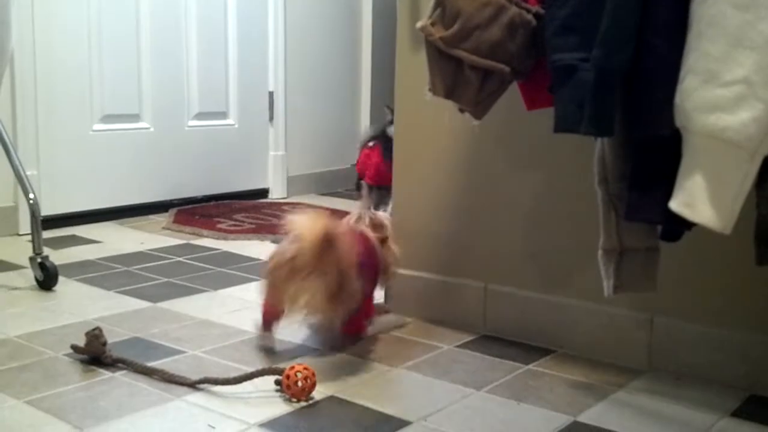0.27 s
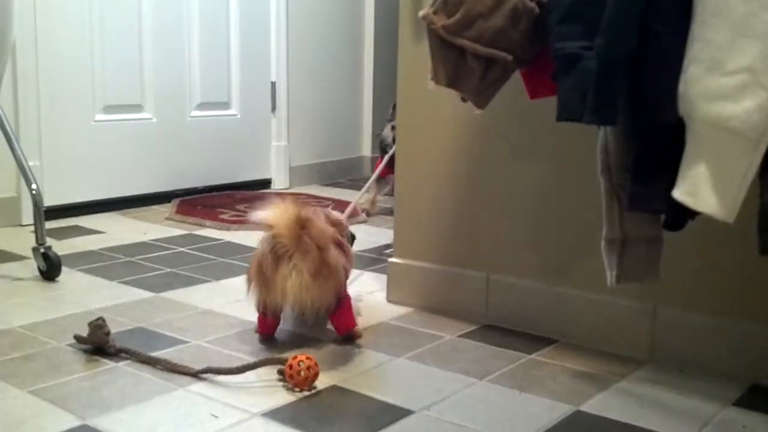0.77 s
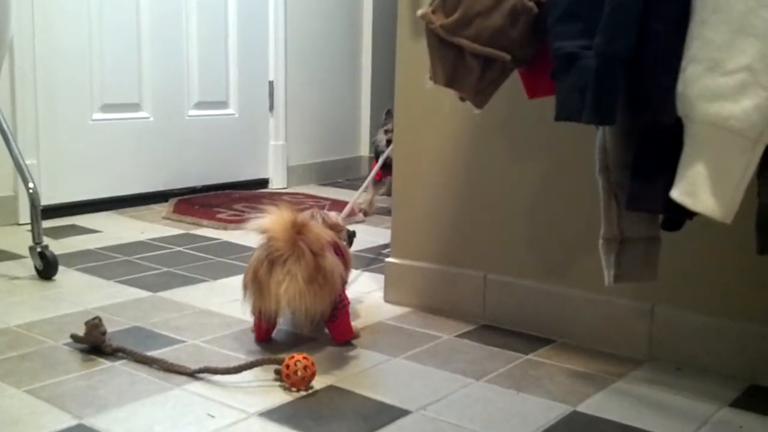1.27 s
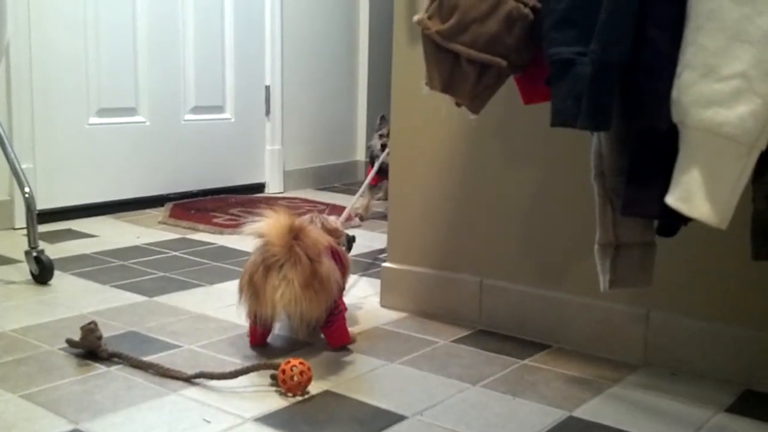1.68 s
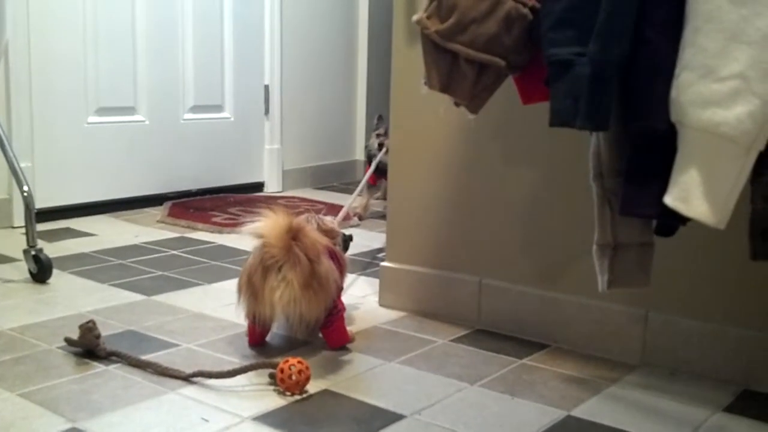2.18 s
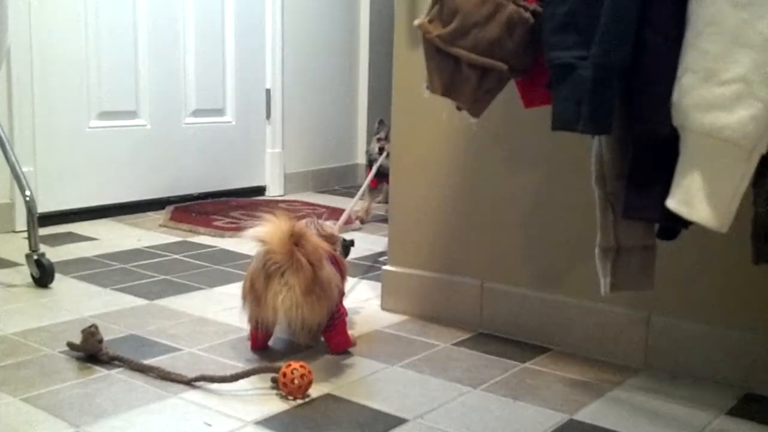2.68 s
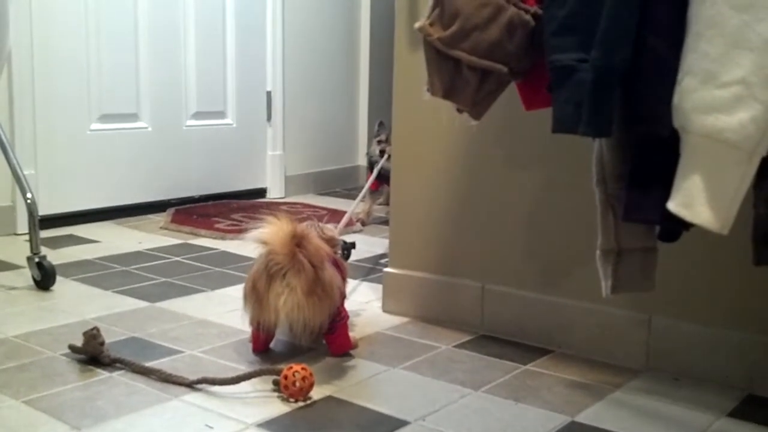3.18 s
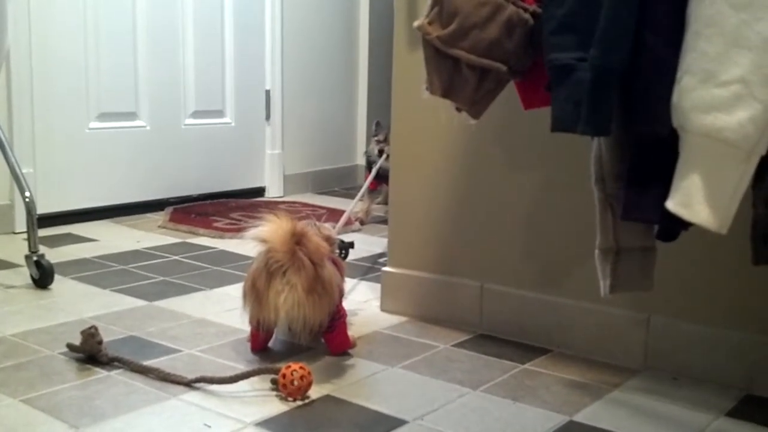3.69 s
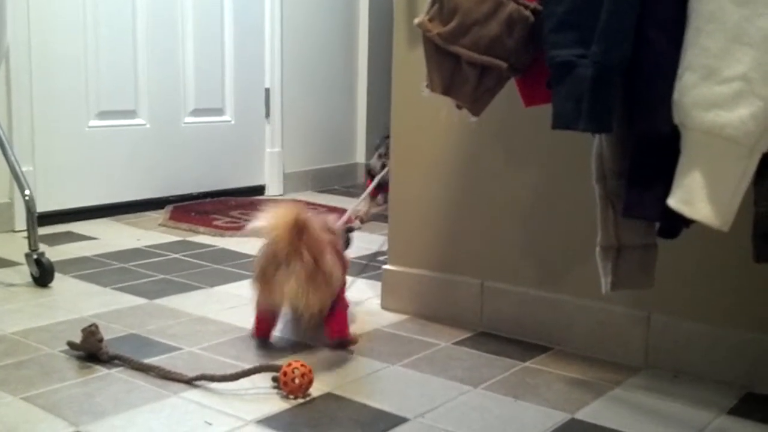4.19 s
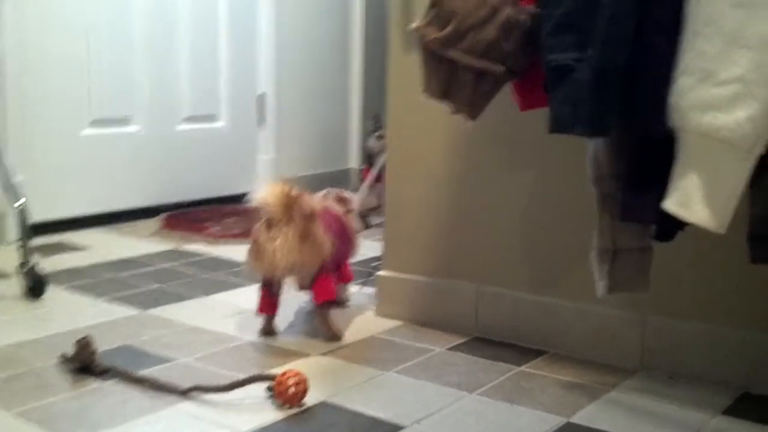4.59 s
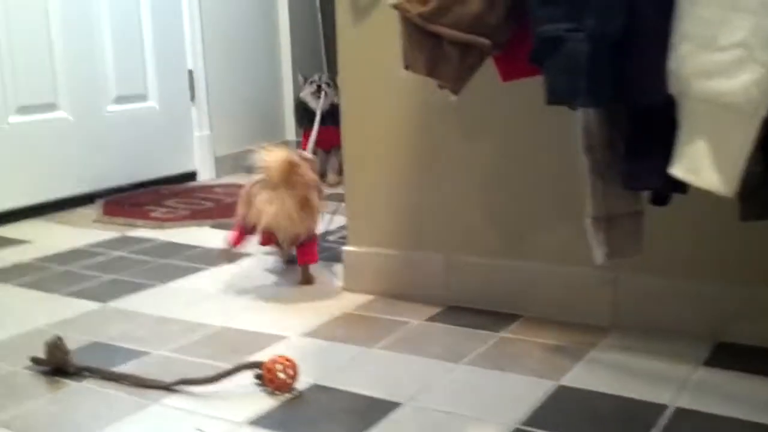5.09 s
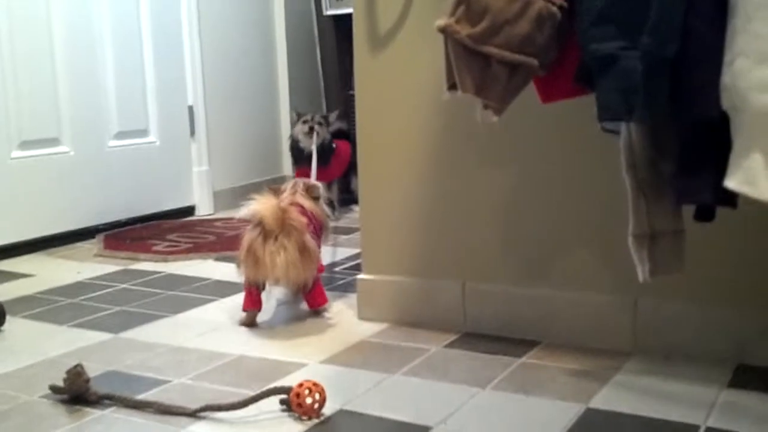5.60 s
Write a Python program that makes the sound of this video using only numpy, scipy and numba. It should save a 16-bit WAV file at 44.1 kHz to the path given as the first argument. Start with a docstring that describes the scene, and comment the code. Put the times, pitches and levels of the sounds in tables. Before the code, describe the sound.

Two small dogs play tug in a tiled hallway, a couple of metres from a hand-held stereo microphone. One snorts and gives a quick run of hoarse barks, then growls through its teeth in long throbbing stretches while the other growls lower and softer underneath. Paws scuff faintly on the tiles. Near the end come more snorts and short barks, and both finish growling. A few tiny ticks sound on the microphone.

```python
"""Two small dogs tug a rope in a tiled hallway, a couple of metres from a hand-held stereo microphone.
First the higher dog snorts and barks hoarsely while the lower one hums under it and paws scuff the tiles.
Near 1 s the microphone's housing ticks; then the higher dog growls through its teeth, vocal folds pulsing,
loose tissue fluttering. From 4.3 s it snorts and barks again, and both end on a growl. Two spaced ports
hear dogs, walls and faint room noise; each is subtracted, late, from the other to widen the image."""
import sys
import numpy as np
from scipy import signal
from scipy.fft import rfft, irfft
from scipy.io import wavfile
from scipy.ndimage import uniform_filter1d
from numba import njit

SR = 44100
rng = np.random.default_rng(int(sys.argv[2]) if len(sys.argv) > 2 else 0)


def transcribe(u):
    """Save the signal u as a 16-bit wav file named by the first command-line argument.

    u: samples, shape (n,) or (channels, n), limited to [-1, 1]; the rate is SR.
    q: integer samples, one column per channel.
    """
    v = np.clip(np.atleast_2d(u).T, -1, 1)
    q = np.round(v * 32767).astype(np.int16)
    wavfile.write(sys.argv[1], SR, q)


N = 257984

# Higher dog's barks: start_s, length_s, top_pitch_hz, base_level_db, mouth_open (0-1), chest_db, air_db,
# throat_ratio (scales the resonances), pitch_arch_exponent, top_resonance_db
BARKS = [(-.005, 0.31, 322.5, -27.5, 0.93, 0.5, -5, 0.92, 1.1, -3.7),
         (0.169, 0.12, 318.2, -31, 0.88, 7.5, -0.5, 0.92, 0.79, -4),
         (0.282, 0.21, 290.7, -32.5, 0.66, -1, -3.5, 0.96, 0.65, -5),
         (0.505, 0.17, 335.3, -28, 0.59, 0.5, -4, 0.934, 1.3, -10),
         (0.622, 0.27, 304.6, -31, 0.22, -0.5, -6, 0.941, 1.2, -3.5),
         (4.302, .18, 337.5, -28.5, 0.96, 2, 0, 0.95, 2, 0.3),
         (4.561, 0.13, 291.3, -50, 0.85, -10, 9.5, 0.87, 0.56, 8.2),
         (5.013, .14, 396, -24, 1, -3, -26, 0.96, 2.2, -1.2)]
# Course of every bark; the chest tone sinks while the cry is hardest:
# length_share, pitch_ratio, level_offset_db, chest_offset_db, mouth_share
BARK_COURSE = [(0, .88, -9, 4, 0.87), (0.12, 0.94, -2.5, 2, 0.84), (0.331, 1.0, 1, -8.5, 0.97),
               (0.523, 0.96, -8, 4, 0.98), (0.749, .91, -11.5, -10.5, 0.83), (1, .88, -27.5, 10, 0.15)]
# Each dog's growls, one curve a growl: time_s, pitch_hz, base_level_db
HIGH_GROWLS = [
    [(1.194, 224.9, -54), (1.206, 225, -41), (1.26, 225.8, -39.5), (1.35, 218.5, -41.5),
     (1.8, 220.7, -42.5), (2.2, 219.9, -43.5), (2.29, 225.8, -42)],
    [(2.3, 232, -40.5), (2.4, 235, -41), (2.5, 226, -41), (2.58, 227.4, -42.5), (2.67, 222.9, -42),
     (2.73, 225.3, -78)],
    [(3.21, 189, -58), (3.29, 201.2, -48), (3.45, 198.6, -51), (3.6, 207.8, -51), (3.72, 216.3, -52),
     (4.02, 218.6, -49), (4.1, 220.5, -49), (4.22, 223.3, -47)],
    [(4.245, 250.9, -38.5), (4.275, 264.4, -42.5), (4.297, 253.6, -32.5)],
    [(4.93, 178.9, -53), (4.945, 185.3, -42.5), (4.965, 197.7, -41.5), (4.985, 211.7, -39),
     (5.005, 228, -34.5)],
    [(5.19, 287.7, -38.5), (5.24, 281, -41), (5.29, 272, -42)],
    [(5.315, 265.1, -40.5), (5.35, 259.8, -40.5), (5.43, 250.5, -44.5), (5.5, 242.7, -44)],
    [(5.52, 237.4, -43), (5.6, 229.5, -42), (5.7, 224.7, -43.5), (5.85, 234.7, -39)],
]
LOW_GROWLS = [
    [(.2, 171.9, -56), (.35, 195.8, -55), (.5, 187.2, -47), (.6, 183.3, -51), (.69, 199.6, -49),
     (.93, 166, -58), (1.2, 153.5, -56), (1.34, 136.9, -61)],
    [(2.18, 150.9, -82), (2.27, 152.2, -53), (2.52, 156.4, -56.5), (2.68, 172.4, -51), (2.87, 166.2, -53.5),
     (3.0, 160.1, -57), (3.31, 152.1, -53.5), (3.58, 151.5, -53), (3.85, 163.1, -51), (4.0, 174.5, -49.5),
     (4.15, 186, -44), (4.2, 192.4, -48)],
    [(4.225, 196.6, -47.5), (4.27, 197, -48.5), (4.31, 196.3, -38.5)],
    [(5.15, 197.1, -59), (5.3, 190.8, -60), (5.57, 181.1, -53), (5.7, 180.7, -51), (5.85, 190.3, -54.5)],
]
# Posture in each growl: mouth_open (0-1), chest_db, air_db, throat_ratio, top_resonance_db
HIGH_POSTURES = [(0.04, -1, -9, 0.987, -1.4), (0.13, -1.5, -11, 0.987, -0.3), (0.1, 4, -12, 0.957, 1.6),
                 (0.34, -12, -11, 1.25, -5), (0.27, 1, -4.5, 0.947, -11), (0.71, -8, 1, 1.12, -1),
                 (0.73, 2.5, 0, 1.033, -1.3), (0.47, 1.5, -1, 0.911, -3.5)]
LOW_POSTURES = [(0.73, -2.5, 1.5, 1.05, 0), (0.22, 6, -6.5, 0.979, 0), (0.66, -15, -2, 1.026, 0),
                (0.39, 5.5, -32, 0.947, 0.0012)]
# Texture of each bark or growl: roughness (0-1), mean_flutter_depth (0-1)
BARK_TEXTURES = [(.65, .42), (.5, .4), (.38, .35), (.45, .25), (.1, .12), (.65, .3), (.5, .4), (.7, .4)]
HIGH_TEXTURES = [(.14, .62), (.16, .5), (.3, .3), (.2, .15), (.5, .2), (.55, .35), (.4, .3), (.4, .5)]
LOW_TEXTURES = [(.15, .2), (.32, .3), (.12, .15), (.38, .3)]
# Throat resonances, mouth shut and open: shut_hz, open_hz, base_width_hz, shut_db, open_db
HIGH_THROAT = [(321, 510, 262, -4, -8.5), (867, 956, 155, -4, -17.5), (1480, 1517, 355, -20, -4.5),
               (2317, 2250, 307, -10, -32), (4015, 4570, 2030, -17.5, -20.5)]
LOW_THROAT = [(308, 242, 144, 6, 9.5), (608, 524, 147, 0, 1), (1080, 1210, 500, -29, 3.5),
              (2100, 2800, 410, -28, -31), (3800, 3900, 400, -56, -38)]
# How hard each resonance throbs, the second the most: flutter_exponent
THROB_EXPONENTS = (.8, 1.15, .6, .4, .3)
# In the higher dog's long growls the chest tone hangs under the pitch, then joins it: time_s, pitch_ratio
CHEST_SAG = [(1.1, 1), (1.2, .94), (1.35, .935), (1.7, .95), (2.25, 1), (3.55, 1), (3.75, .94), (4.0, .94),
             (4.2, 1)]
# Resonance behind the higher dog's teeth in the long growls: time_s, centre_hz, gain_db
TEETH_RESONANCE = [(1.099, 3900, -53), (1.2, 3902, -11.5), (1.45, 4045, -10), (1.8, 4034, -10),
                   (2.1, 4252, -12.5), (2.7, 4370, -12.5), (3.3, 4008, -11), (4.0, 4101, -11.5),
                   (4.2, 4205, -60)]
# Snorts through the nose: peak_s, length_s, flow_db
SNORTS = [(0.063, 0.026, -36), (0.566, 0.038, -52), (4.28, 0.034, -34.5), (4.357, 0.054, -54),
          (4.49, 0.069, -48), (5.09, 0.083, -32)]
# Paws on the tiles, plus one short 4 kHz click near 1.04 s: start_s, decay_s, level_db, centre_hz
PAW_SCUFFS = [(0.035, 0.09, -55, 6130), (0.553, 0.041, -58, 9000), (0.917, 0.037, -45, 4194),
              (1.044, .01, -58, 4200), (4.044, .12, -52, 13560), (4.072, 0.091, -49, 4200),
              (4.166, 0.098, -62, 13000), (4.476, 0.078, -64, 4446), (4.589, 0.059, -65, 5440),
              (4.673, 0.088, -56, 4918), (4.844, .015, -60, 5020)]
# Ticks on the microphone's housing: start_s, strength_db
HOUSING_TICKS = [(0.9862, -43), (0.9959, -30), (1.0035, -42), (1.0244, -44), (1.031, -28), (1.0357, -30),
                 (3.952, -45), (4.8541, -32)]
# Spectrum of the empty hallway: frequency_hz, relative_density_db
ROOM_SPECTRUM = [(60, 1), (130, 15), (400, -4.5), (1000, -4), (1600, -2.5), (3000, -12.5), (8000, -27.5),
                 (16000, -31)]

# (clear, rough) voice: cycle-length jitter, strong-weak alternation, rasp against the harmonics
JITTER, ALTERNATION, RASP_DB = (.004, .04), (.07, .36), (-10, -3)
SOFT_CLOSURE_HZ = 2600  # above this the fold pulses give way to rasp
CHEST_WAVER_DB, CHEST_LOSS = 2.5, .92  # loss in dB per dB over the growl's mean level
TEETH_WIDTH_HZ, AIR_TOP_HZ, AIR_TOP_DB = 1150, 11340, 4
SCUFF_ATTACK_S, SCUFF_WIDTH_RATIO, GRIT_DB = .006, .81, 1
HALL_T60_S, HALL_TREBLE_T60_S, HALL_DB, ROOM_NOISE_DB = .42, .4, -5, -49
HIGH_LAG_S, LOW_LAG_S = .00014, .00005  # each dog reaches the left port first
PORTS_ALIKE_HZ = 790  # below this both ports hear nearly the same tail
SHADE_HZ, SHADE_DB = 1220, -69  # the housing shades the right port's treble
WIDEN_LAG_SAMPLES, WIDEN_SHARE, BASS_CUT_HZ, TOP_CUT_HZ = 16, .99, 120, 15750


def barks():
    """Bark phrases for dog(): pitch, level and mouth arch and fall, unless the next bark cuts in."""
    share, pitch_ratio, swell_db, sink_db, gape = np.transpose(BARK_COURSE)
    next_starts = [bark[0] for bark in BARKS[1:]] + [N / SR]
    phrases = []
    for bark, next_s, texture in zip(BARKS, next_starts, BARK_TEXTURES):
        start_s, length_s, top_hz, level_db, mouth, chest_db, air_db, stretch, arch, bright_db = bark
        times = start_s + share * length_s
        pitch_hz = top_hz * pitch_ratio ** arch
        curve = np.c_[times, pitch_hz, level_db + swell_db, chest_db + sink_db, mouth * gape]
        phrases.append((curve[times < next_s], (air_db, stretch, bright_db, *texture)))
    return phrases


def growls(curves, postures, textures):
    """Growl phrases for dog(): as effort rises, the chest tone gains less than the overtones."""
    phrases = []
    for curve, (mouth, chest_db, *tone), texture in zip(curves, postures, textures):
        level_db = np.transpose(curve)[2]
        chest_curve_db = chest_db - CHEST_LOSS * (level_db - level_db.mean())
        phrases.append((np.c_[curve, chest_curve_db, np.full(len(curve), mouth)], (*tone, *texture)))
    return phrases


def dog(phrases, throat, sag, snorts=(), teeth=None):
    """Fold pulses and rasp, puffed out once a cycle, ring the chest, the throat and any teeth gap."""
    gate, curves, posture = articulation(phrases)
    pitch_hz, level_db, chest_db, mouth = curves
    air_db, stretch, bright_db, roughness, flutter_depth = posture
    jitter, alternation, rasp_db = (clear + roughness * (rough - clear)
                                    for clear, rough in (JITTER, ALTERNATION, RASP_DB))
    drift = 1 + .005 * wander(30)
    chance = rng.standard_normal((N // 50, 2))
    pulses, phase = vocal_folds(pitch_hz * drift, jitter, alternation, chance)
    pulses = butter(pulses, 2, SOFT_CLOSURE_HZ)
    chest_hz = pitch_hz * follow(sag)[0]
    chest_pulses, _ = vocal_folds(chest_hz * drift, jitter, alternation, chance)
    flutter = tissue_flutter(flutter_depth)
    puff = unit_rms(np.exp(-phase / 1.4)) * flutter ** .11
    harmonic_strength = np.sqrt(SR / 2 / pitch_hz)  # noise this big equals the harmonics, per Hz
    rasp = undb(rasp_db) * harmonic_strength * puff * rng.standard_normal(N)
    chest = resonance(chest_pulses * (flutter + .2) ** .3 + .5 * rasp, chest_hz, .35 * pitch_hz)
    voice = undb(chest_db + CHEST_WAVER_DB * wander(16)) * chest
    for k, (shut_hz, open_hz, base_width_hz, shut_db, open_db) in enumerate(throat):
        drive = (pulses if k else chest_pulses) * flutter ** THROB_EXPONENTS[k] + rasp
        centre_hz = stretch * (shut_hz + mouth * (open_hz - shut_hz))
        gain_db = shut_db + mouth * (open_db - shut_db) + (k == len(throat) - 1) * bright_db
        voice += (-1) ** (k + 1) * undb(gain_db) * resonance(drive, centre_hz, 1.133 * base_width_hz)
    if teeth is not None:
        teeth_hz, teeth_db = follow(teeth)
        voice += undb(teeth_db) * resonance(pulses + rasp, teeth_hz, TEETH_WIDTH_HZ)
    air = breath(gate * undb(level_db + air_db), snorts, puff)
    return gate * undb(level_db + 7) * voice + air


def articulation(phrases, fade_s=.01954):
    """The voice fades in and out of each (curve, posture) phrase; the throat glides between postures."""
    t = np.arange(N) / SR
    points = np.vstack([curve for curve, _ in phrases])
    curves = follow(points[np.argsort(points[:, 0])])
    gate, posture = np.zeros(N), np.ones((5, N))
    for curve, held in phrases:
        inside_s = np.minimum(t - curve[0, 0], curve[-1, 0] - t)
        sounding = np.clip(1 + inside_s / fade_s, 0, 1)
        gate = np.maximum(gate, sounding)
        posture[:, sounding > 0] = np.array(held)[:, None]
    return gate, curves, uniform_filter1d(posture, int(fade_s * SR), axis=1)


@njit
def vocal_folds(pitch_hz, jitter, alternation, chance):
    """One pulse per closing of the folds; each cycle has its own length and size."""
    pulses, phases = np.zeros(N + 1), np.empty(N)
    phase, cycle = 0., 0
    for i in range(N):
        step = pitch_hz[i] * (1 + jitter[i] * chance[cycle, 0]) / SR
        phase += step
        if phase >= 1:
            phase, cycle = phase - 1, cycle + 1
            strong_weak = 1 + alternation[i] * (1 - 2 * (cycle % 2))
            size = (1 + 4 * jitter[i] * chance[cycle, 1]) * strong_weak / step
            pulses[i] += size * phase / step  # the closing falls between two samples
            pulses[i + 1] += size * (1 - phase / step)
        phases[i] = phase
    return pulses[:-1] / np.sqrt(2), phases


def tissue_flutter(depth, mean_hz=25.6):
    """Loose tissue flaps unevenly in the airway: a gain that makes the voice throb."""
    depth = np.clip(depth * (1 + .45 * wander(11)), 0, .98)
    rate_hz = mean_hz * (1 + .13 * wander(14))
    return 1 + depth * np.sin(2 * np.pi * np.cumsum(rate_hz) / SR)


def breath(flow, snorts, puff):
    """Air hisses past the teeth and snorts through the nose; its top treble flickers on its own."""
    t = np.arange(N) / SR
    hiss = butter(rng.standard_normal(N), 1, 3000, "high")
    top = butter(hiss, 4, AIR_TOP_HZ, "high") / np.std(hiss)
    hiss = unit_rms(hiss) + top * (undb(AIR_TOP_DB + 1.9 * wander(18)) - 1)
    for peak_s, length_s, flow_db in snorts:
        flow = flow + undb(flow_db) * np.exp(-(2 * (t - peak_s) / length_s) ** 2)
    return flow * undb(2 * wander(25.86)) * (.11 + .21 * puff) * hiss


def paw_scuffs():
    """Paws slip on the tiles: gritty friction noise that starts sharply and dies away; one short click sounds
    among them."""
    grit = rng.standard_normal(N) * undb(GRIT_DB * wander(400))
    out = np.zeros(N)
    for start_s, decay_s, level_db, centre_hz in PAW_SCUFFS:
        span = slice(int(start_s * SR), int((start_s + 5 * decay_s) * SR))
        friction = unit_rms(resonance(grit[span], centre_hz, SCUFF_WIDTH_RATIO * centre_hz))
        age_s = np.arange(len(friction)) / SR
        envelope = np.minimum(age_s / SCUFF_ATTACK_S, 1) * np.exp(-age_s / decay_s)
        out[span] += undb(level_db) * envelope * friction
    return out


def housing_ticks(decay_s=.0005):
    """Tiny treble clicks right on the microphone's housing, different at each port."""
    kicks = np.zeros((1, N))
    for start_s, strength_db in HOUSING_TICKS:
        kicks[0, int(start_s * SR)] = undb(strength_db)
    burst = rng.standard_normal((2, 200)) * np.exp(-np.arange(200) / (decay_s * SR))
    return signal.fftconvolve(kicks, butter(burst, 4, 11800, "high"), axes=1)[:, :N]


def hallway(source, lag_s):
    """Direct sound reaches the right port late and shaded; the tiled walls add a diffuse tail."""
    t = np.arange(int(.7 * SR)) / SR
    noise = rng.standard_normal((2, len(t)))
    dull = butter(noise, 1, 2500)
    tail = dull * undb(-60 * t / HALL_T60_S) + (noise - dull) * undb(-60 * t / HALL_TREBLE_T60_S)
    tail *= np.clip(t / .022 - .4, 0, 1)  # reflections build up after a short gap
    tail *= undb(HALL_DB) / np.sqrt(np.sum(tail[0] ** 2))
    tail[1] = butter(tail[1], 1, PORTS_ALIKE_HZ, "high")
    mid, side = signal.fftconvolve(source[None], tail, axes=1)[:, :N]
    late = np.interp(np.arange(N) - lag_s * SR, np.arange(N), source)
    bass, late_bass = signal.filtfilt(*signal.butter(1, SHADE_HZ, fs=SR), [source, late])
    right = late_bass + undb(SHADE_DB) * (source - bass)
    return np.array([source + mid + side, right + mid - side])


def room_noise():
    """Steady faint room tone, unrelated at the two ports."""
    hz, density_db = np.transpose(ROOM_SPECTRUM)
    bins_hz = np.maximum(np.fft.rfftfreq(N, 1 / SR), 1)
    colour = undb(np.interp(np.log(bins_hz), np.log(hz), density_db))
    noise = irfft(rfft(rng.standard_normal((2, N))) * colour, N)
    return undb(ROOM_NOISE_DB) * unit_rms(noise)


def resonance(x, centre_hz, width_hz):
    """The same band-pass twice, for dark valleys between resonances."""
    centre_hz, width_hz = np.full(len(x), centre_hz), np.full(len(x), width_hz)
    return band_pass(band_pass(x, centre_hz, width_hz), centre_hz, width_hz)


@njit
def band_pass(x, centre_hz, width_hz):
    """State-variable filter with a moving centre and width, gain 1 at the centre."""
    out, band_state, low_state = np.empty(len(x)), 0., 0.
    for i in range(len(x)):
        tuning, damping = np.tan(np.pi * centre_hz[i] / SR), width_hz[i] / centre_hz[i]
        band = (band_state + tuning * (x[i] - low_state)) / (1 + tuning * (tuning + damping))
        band_state, low_state = 2 * band - band_state, low_state + 2 * tuning * band
        out[i] = damping * band
    return out


def butter(x, order, corner_hz, kind="low"):
    """Low-pass or high-pass with a flat passband."""
    return signal.sosfilt(signal.butter(order, corner_hz, kind, fs=SR, output="sos"), x)


def follow(points):
    """Rows of (time_s, values...) joined into one line per value."""
    times, *columns = np.transpose(points)
    return [np.interp(np.arange(N) / SR, times, column) for column in columns]


def wander(rate_hz):
    """Random levels, held and smoothed twice; rms 1."""
    hold = int(SR / rate_hz)
    steps = np.repeat(rng.standard_normal(N // hold + 1), hold)
    return unit_rms(uniform_filter1d(uniform_filter1d(steps, hold), hold)[:N])


def undb(db):
    """dB to gain."""
    return 10 ** (np.asarray(db) / 20)


def unit_rms(x):
    """Scale to rms 1."""
    return x / np.sqrt(np.mean(x ** 2))


def scene():
    """Dogs and paws a couple of metres down the hallway, ticks at the microphone, room tone behind."""
    high_phrases = barks() + growls(HIGH_GROWLS, HIGH_POSTURES, HIGH_TEXTURES)
    low_phrases = growls(LOW_GROWLS, LOW_POSTURES, LOW_TEXTURES)
    high = hallway(dog(high_phrases, HIGH_THROAT, CHEST_SAG, SNORTS, TEETH_RESONANCE), HIGH_LAG_S)
    low = hallway(dog(low_phrases, LOW_THROAT, sag=[(0, .98)]), LOW_LAG_S)
    return high + low + hallway(paw_scuffs(), HIGH_LAG_S) + housing_ticks() + room_noise()


def record(dry):
    """The microphone subtracts each port, late, from the other, then cuts the bass and the very top."""
    opposite_late = np.pad(dry[::-1], ((0, 0), (WIDEN_LAG_SAMPLES, 0)))[:, :N]
    wide = butter(dry - WIDEN_SHARE * opposite_late, 2, BASS_CUT_HZ, "high")
    return signal.sosfilt(signal.ellip(10, .2, 80, TOP_CUT_HZ, fs=SR, output="sos"), wide)


dry = scene()
out = record(dry)
transcribe(out)
```